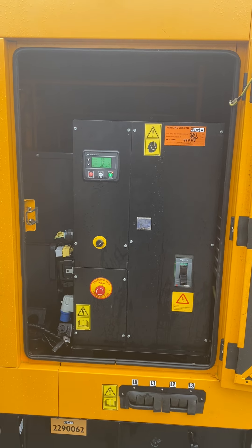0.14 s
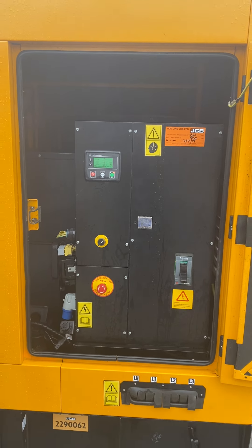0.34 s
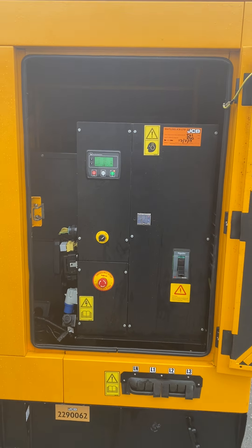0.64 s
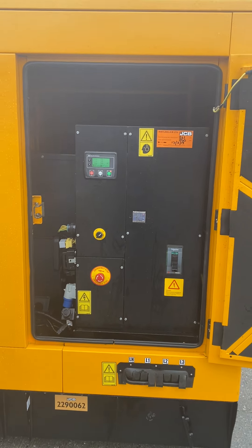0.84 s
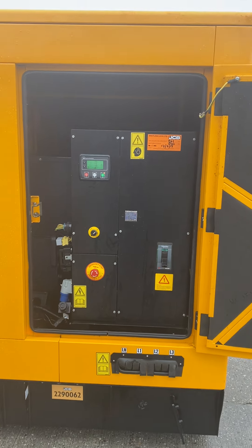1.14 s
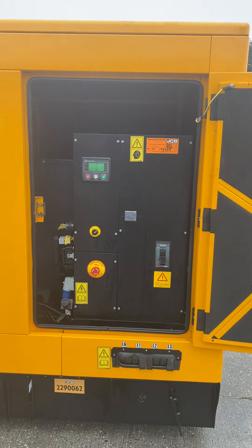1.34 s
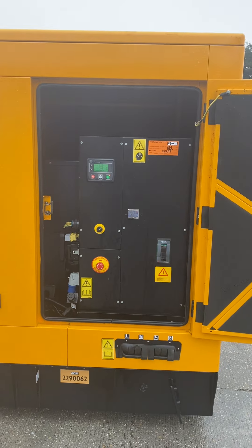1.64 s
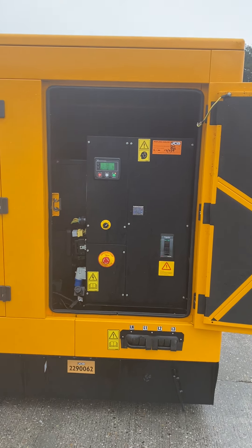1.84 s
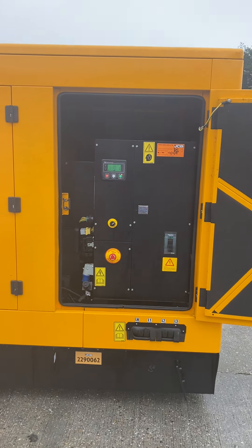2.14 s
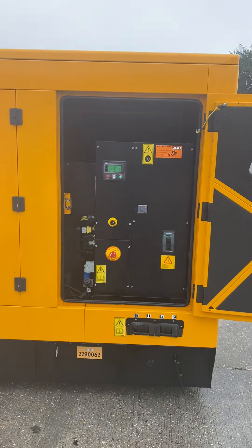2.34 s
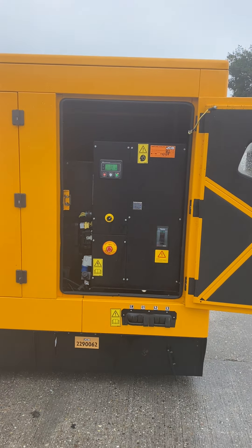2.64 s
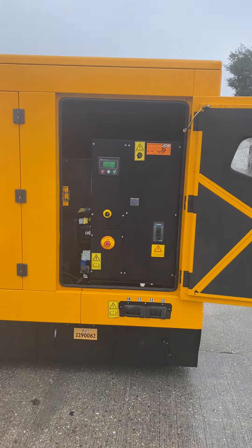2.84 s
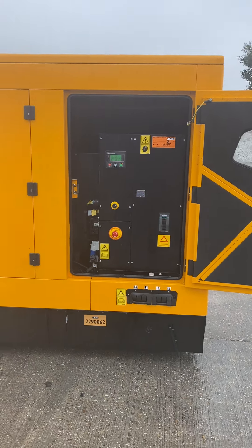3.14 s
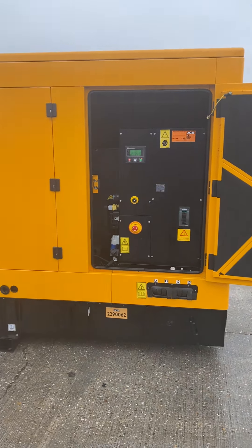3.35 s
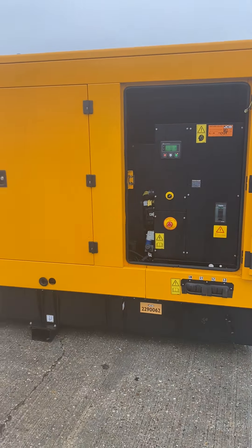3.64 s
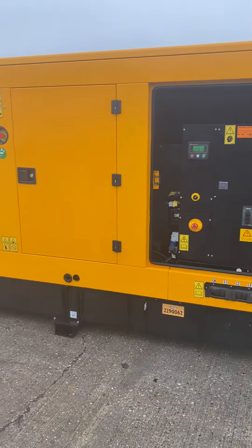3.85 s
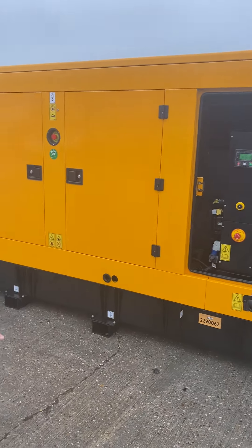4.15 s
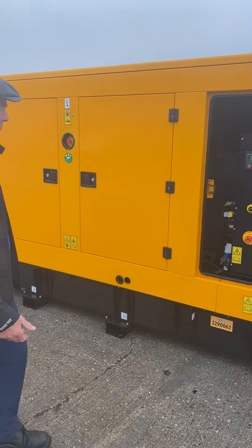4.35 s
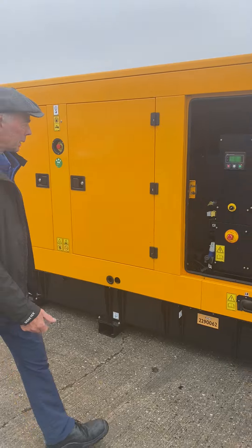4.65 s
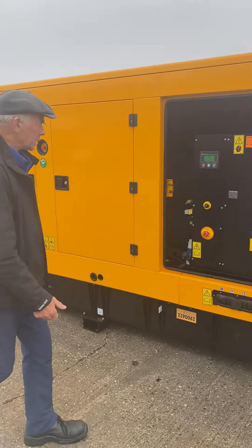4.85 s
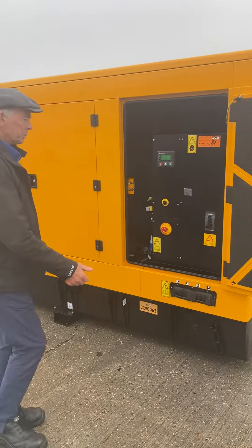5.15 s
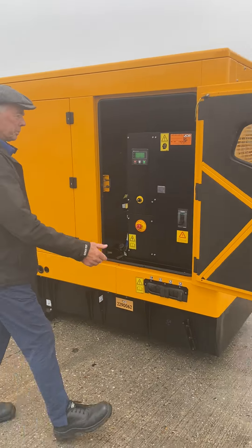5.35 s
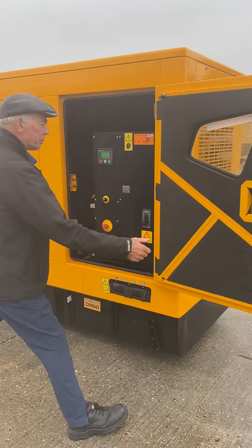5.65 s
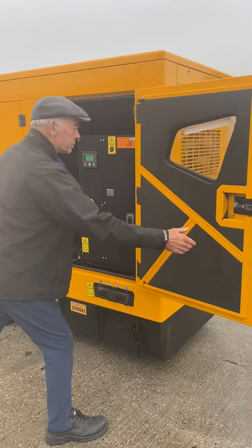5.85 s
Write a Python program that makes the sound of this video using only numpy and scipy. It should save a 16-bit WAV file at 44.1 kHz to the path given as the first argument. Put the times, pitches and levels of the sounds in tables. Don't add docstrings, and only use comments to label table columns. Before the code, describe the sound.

Close outdoor stereo pickup of a diesel engine inside a metal housing in a hard yard. Loud uneven clatter with surging pulses settles within a second into a regular rapid rattle over a deep hum. Midway the tone turns harder and more metallic near the side wall, air roar swells, the plastic case creaks, and a thin turbo whistle peeks through. A light cover tapping becomes clearer near the end.

```python
import sys
import numpy as np
from scipy import signal
from scipy.fft import rfft, irfft, next_fast_len
from scipy.io import wavfile
from scipy.ndimage import uniform_filter1d

SR = 44100
rng = np.random.default_rng(int(sys.argv[2]) if len(sys.argv) > 2 else 0)


def digitize_waveform(pressure):
    field = np.atleast_2d(pressure).T
    bounded = np.clip(field, -1, 1)
    quanta = np.round(bounded * 32767).astype(np.int16)
    wavfile.write(sys.argv[1], SR, quanta)


def gain_from_db(level_db):
    decades = np.asarray(level_db, float) / 20
    return 10 ** decades


N = 265041
T = np.arange(N) / SR
HZ = np.maximum(np.fft.rfftfreq(next_fast_len(N), 1 / SR), 1)

CYCLE = 3532
CYCLE_HZ = SR / CYCLE
FIRST_KNOCK_S = 0.0246

# start_s, nearness_db, side_share (0 at the door, 1 at the side wall), outlet_db (exhaust exposure)
WALK = [(0, 1, 0, 1.5), (.7, 0.5, 0, -2), (1.2, -1.5, 0, -2.5), (1.5, -2, 0.05, -3.5),
        (1.75, -4, 0.09, -6.5), (2.0, -4, 0, -8), (2.35, -4.5, 0.02, -3.5), (2.7, -3, 0.66, 1.5),
        (3.0, 0, 1, 3.5), (3.25, 1.5, 1, 6), (3.55, 0.5, 0.99, 1), (4.2, 0.5, 0.99, 0.5), (4.6, 0, 1, -1.5),
        (5.0, -1, 0.96, -4), (5.3, -3.5, 0.93, -1.5), (5.65, -4, .9, -3), (6.01, -7.5, 0.96, -2.5)]
CYLINDER_DB = [-1, -5, -7.5, -0.5, -13.5, -4]

# pitch_hz, width_hz, level_db
PANEL_DOOR = [(757, 44, 1.5), (800, 18.3, 2.5), (842.8, 81, 0), (700, 13, -29), (936, 37, -11)]
PANEL_SIDE = [(739, 37, -11.5), (786.3, 40, -3), (856.5, 38, -5), (907, 34, -8)]
# pitch_hz, width_hz, level_db
CAST_DOOR = [(1555, 78, -1), (1872, 25, 0.5), (2588, 29, 6), (2960, 12, 6), (3180, 34, -0.5),
             (3720, 59, 3.5), (3970, 54, 2), (4340, 37, 7)]
CAST_SIDE = [(1185, 12, -7.5), (1536, 26, -8.5), (2041, 54, -4.5), (2368, 27, 3), (2777, 12, 7.5),
             (2953, 43, 3), (3290, 57, -1), (3890, 63, -3), (4615, 64, 3.5), (6110, 63, -4)]
# pitch_hz, level_db
BLOCK_DOOR = [(580, -28.5), (980, -3), (1160, 1.5), (1200, -5.5), (1340, -2), (1410, -5), (1520, -2),
              (1760, -1.5), (1900, 0.5), (2310, -6.5), (2400, -17), (3120, -46), (5280, -120)]
BLOCK_SIDE = [(580, -30), (980, -1.5), (1030, -2.5), (1120, -4.5), (1160, -2.5), (1240, -4), (1370, -4.5),
              (1630, -1.5), (1780, -0.5), (2000, -4), (2400, -12.5), (3120, -42), (5280, -120)]
# pitch_hz, level_db
TICK_DOOR = [(1470, -9), (2500, -2), (2690, -1.5), (2800, -6.5), (3100, -7), (3420, -3.5), (3810, -5),
             (4170, -10), (4980, -14), (5430, -12.5), (7000, -13.5), (9100, -21), (15400, -120)]
TICK_SIDE = [(1470, -13), (2500, -0.5), (3050, -5.5), (3320, -3), (3590, -4.5), (4050, -4.5), (4920, -15.5),
             (5380, -9.5), (5480, -12), (6200, -10), (7000, -9.5), (9100, -20), (15400, -120)]
# pitch_hz, level_db (against the ring)
PANEL_ORDERS = [(749, -8.5), (849, -7.5)]
# pitch_hz, level_db (against the clatter)
ORDERS_SIDE = [(1000, -14.5), (1175, -12), (1275, -13), (1537, -30), (1574, -18.5), (1611, -14.5),
               (1686, -16.5), (2074, -19)]
# pitch_hz, level_db
RUMBLE_DOOR = [(53, -28), (90, -5.5), (97, -12), (150, -8), (220, -10), (285, -5.5), (350, -1), (460, -14),
               (600, -44.5), (1010, -120)]
RUMBLE_SIDE = [(53, -27), (90, -2.5), (107, -3), (274, -2.5), (312, -2.5), (338, -2), (377, -5),
               (460, -10.5), (600, -48), (1010, -120)]
# pitch_hz, level_db
HISS_DOOR = [(5500, -30), (7000, -6), (8200, 0), (10000, 1), (12000, 0), (14000, -1.5), (15700, -3)]
HISS_SIDE = [(5500, -30), (7000, -4), (8200, -2), (10000, -1), (12000, -1), (14000, -2), (15700, -3)]
# pitch_hz, level_db
DUCT_ROAR = [(440, -10.5), (480, 2), (580, 2.5), (680, 7.0), (720, 0)]

# door_db, side_db, nearness_share, outlet_share, startup_db, lope_db
PANEL_MIX = (-28, -37, 0.76, 0.08, 0, 4)
BLOCK_MIX = (-35, -34, 1.08, 0.02, 7, 3.5)
TICK_MIX = (-45.5, -42, 1.06, 0.03, 10, 2)
WHISTLE_MIX = (-84, -65, 0, 1.4, 0.1, -5)
TONE_MIX = (-44.5, -36, 1.1, 0.18, -4.3, -3)
RUMBLE_MIX = (-36.5, -37.5, 0.37, 1.21, 3, 0.5)
AIR_MIX = (-60, -59.5, 0.7, 0.3, 1, -0.5)
HISS_MIX = (-57.5, -62, 0.8, -0.24, 1, 1)
ROAR_MIX = (-50.5, -45, 1, 0.04, 6.5, 4)
TAP_MIX = (-48, -45.5, 0.3, 0.3, -6, -2)

# start_s, level_db (peak), pitch_hz
CREAKS = [
    (3.855, -15, 650),
    (3.864, -22, 640),
    (3.872, -32, 670),
    (4.011, -15.5, 710),
    (4.019, -15.5, 640),
    (4.026, -19, 700),
    (4.037, -14.5, 640),
    (4.129, -29, 694),
    (4.141, -20.5, 614),
    (4.149, -14.5, 633),
          (1.46, -30, 610),
    (1.527, -57, 640),
    (1.616, -28, 655),
    (1.703, -29.5, 646),
    (2.319, -49, 678),
    (2.398, -31, 665),
    (5.257, -38, 680),
    (5.729, -31, 630),
    (5.98, -34.5, 630),
]
# start_s, level_db (peak), pitch_hz
THUMPS = [
    (1.74, -38, 45),
    (4.04, -30, 42.4),
    (4.16, -33, 48),
]
# middle_s, level_db, width_s (of the bell-shaped swell), centre_hz
SCUFFS = [
    (0.75, -49, 0.012, 13000),
    (0.758, -35.5, 0.028, 9750),
    (3.21, -44, 0.0095, 9900),
    (3.344, -42.5, 0.019, 8050),
    (3.635, -51, .004, 13000),
    (3.933, -43, 0.0055, 9200),
]

# pitch_hz, level_db
LEAN = [(400, -23), (800, 8.5), (1300, -20.5), (2400, -7), (4400, -25.5)]
# pitch_hz, level_db
GROUND = [(400, -0.5), (830, -17), (1300, -16), (2400, -4), (4000, -9), (4700, -31)]
# pitch_hz, level_db
YARD = [(400, -13), (830, -14), (1100, -10), (2400, -8), (4200, -9), (6000, -12), (15700, -12)]
# low_hz, high_hz
NULL_HZ = (8530, 11120)

STARTUP_S = 0.53
LOPE_PEAK_S, LOPE_PERIOD_S, LOPE_ENDS_S, LOPE_FADE_S, LOPE_DECAY_S = 0.055, 0.1553, 0.58, 0.06, 1.4
STEADY_SHARE, SETTLE_S = 0.96, 0.1
TURN_S, TURN_LENGTH_S = 5.03, 0.42
TURN_TAP_DB, TURN_HISS_DB, TURN_ROAR_DB = 13, 3, 4.5
WHISTLE_HZ = 5198
BEAM_S, BEAM_WIDTH_S, BEAM_DB = 4.46, 0.2, 10
DUCT_S, DUCT_WIDTH_S, DUCT_DB = 3.44, 0.31, 7.5
TAP_HZ = 126 * CYCLE_HZ
CORNER_S, CORNER_WIDTH_S, CORNER_DB, CORNER_HZ = 2.89, 0.24, -35.5, 262
DOORWAY_HZ, DOORWAY_DB = 60 * CYCLE_HZ, -34
DOORWAY_FROM_S, DOORWAY_TO_S, DOORWAY_FADE_S = 0.56, 1.42, 0.098
RATTLE_HZ, RATTLE_DB, RATTLE_FROM_S, RATTLE_TO_S = 3320, -53, 4.2, 5.7
LEAN_DOOR, LEAN_SIDE, LEAN_TURNED = 0.76, 0.85, -0.3
LEAN_PER_DB = 0.14
PORT_LAG_S, GROUND_LAG_S = 53e-6, 0.000639
TOP_HZ = 15790


def engine(aside, steady):
    return panels(aside, steady) + block(aside, steady) + ticks(aside, steady) + whistle()


def panels(aside, steady):
    shaking = clatter(0.94, steady) * knocks(0.94, 0.0084)
    ringing = heard(shaking, modes(PANEL_DOOR, order=2), modes(PANEL_SIDE, order=2), aside)
    return gain_from_db(heard_db(PANEL_MIX)) * (ringing + lines(PANEL_ORDERS, 3.88))


def block(aside, steady):
    shaking = clatter(0.86, steady) * knocks(1.3, 0.0038, uneven=1.3)
    door = (1 + modes(CAST_DOOR, order=1)) * colour(BLOCK_DOOR)
    side = (1 + modes(CAST_SIDE, order=1)) * colour(BLOCK_SIDE)
    orders = lines(ORDERS_SIDE, 2.134)
    return gain_from_db(heard_db(BLOCK_MIX) - 1.42) * (heard(shaking, door, side, aside) + aside * orders)


def ticks(aside, steady):
    striking = clatter(0.37, steady) * knocks(1.74, 0.0027, uneven=3.7)
    door = (1 + modes(CAST_DOOR, order=1)) * colour(TICK_DOOR)
    side = (1 + modes(CAST_SIDE, order=1)) * colour(TICK_SIDE)
    return gain_from_db(heard_db(TICK_MIX) + 1.7) * heard(striking, door, side, aside)


def whistle():
    level_db = heard_db(WHISTLE_MIX) + BEAM_DB * passing(BEAM_S, BEAM_WIDTH_S)
    tone = np.sin(2 * np.pi * WHISTLE_HZ * T + 0.61 * walk(33))
    return gain_from_db(level_db + 2.1 * walk(8.2) + 3.0) * tone


def clatter(repeat, steady, memory=0.899):
    turns = rng.standard_normal((2, N // CYCLE + 41, CYCLE))
    turns = signal.lfilter([np.sqrt(1 - memory ** 2)], [1, -memory], turns, axis=1)
    again = turns[:, 40:].reshape(2, -1)[:, :N]
    share = repeat * steady
    return np.sqrt(share) * again + np.sqrt(1 - share) * rng.standard_normal((2, N))


def knocks(depth, decay_s, uneven=0.88):
    firing = (T - FIRST_KNOCK_S) * CYCLE_HZ * 6
    since_s = firing % 1 / (6 * CYCLE_HZ)
    cylinder = np.floor(firing).astype(int) % 6
    size = gain_from_db(uneven * np.array(CYLINDER_DB))[cylinder]
    return 1 + depth * size * np.exp(-since_s / decay_s) * (1 - np.exp(-since_s / 0.0007))


def lines(table, rate):
    out = np.zeros(N)
    for hz, db in table:
        phase = 2 * np.pi * rng.random() + 1.3 * walk(6)
        out += gain_from_db(db + 4.75 * walk(rate)) * np.sin(2 * np.pi * hz * T + phase)
    return out


def exhaust(aside, steady):
    tone = np.sqrt(2) * np.sin(2 * np.pi * 6 * CYCLE_HZ * T + 0.35 * walk(5)) * gain_from_db(0.6 * walk(9))
    blur = unit(shape(clatter(0.72, steady)[0], ring(77.3, 44) ** 2))
    throb = gain_from_db(heard_db(TONE_MIX)) * (1.03 * tone + 0.51 * blur)
    rumble = heard(clatter(0.37, steady)[0], colour(RUMBLE_DOOR), colour(RUMBLE_SIDE), aside)
    air = unit(shape(rng.standard_normal(N), ring(52, 21) ** 2))
    return throb + gain_from_db(heard_db(RUMBLE_MIX)) * rumble + gain_from_db(heard_db(AIR_MIX) + 7) * air


def corner(steady):
    boom = unit(shape(clatter(0.46, steady)[0], ring(CORNER_HZ, 130) ** 2))
    return gain_from_db(CORNER_DB) * passing(CORNER_S, CORNER_WIDTH_S) * boom


def doorway():
    facing = ramp(DOORWAY_FROM_S, DOORWAY_FADE_S) - ramp(DOORWAY_TO_S, DOORWAY_FADE_S)
    tone = np.sin(2 * np.pi * DOORWAY_HZ * T + 0.93 * walk(14.2))
    return gain_from_db(DOORWAY_DB + 1.8 * walk(25.1)) * facing * tone


def cover():
    since_s = (T - FIRST_KNOCK_S - 0.016) % (1 / (3 * CYCLE_HZ))
    ringing = np.exp(-since_s / 0.0056) * (1 - np.exp(-since_s / 0.0024))
    level_db = heard_db(TAP_MIX) + TURN_TAP_DB * ramp(TURN_S, TURN_LENGTH_S)
    tone = np.sin(2 * np.pi * TAP_HZ * T + 0.36 * walk(9.3))
    return gain_from_db(level_db + 8.0 + 0.97 * walk(26)) * ringing * tone


def latch(steady):
    buzz = unit(shape(clatter(0.66, steady)[0] * knocks(3.7, 0.004), ring(RATTLE_HZ, 220) ** 2))
    nearby = ramp(RATTLE_FROM_S, 0.15) - ramp(RATTLE_TO_S, 0.08)
    return gain_from_db(RATTLE_DB + 3.1 * walk(7.7)) * nearby * buzz


def fan(aside, steady):
    stirred = rng.standard_normal((2, N)) * knocks(1.1, 0.0026, uneven=1.1)
    hiss = heard(stirred, colour(HISS_DOOR), colour(HISS_SIDE), aside)
    hiss = hiss * gain_from_db(0.6 * walk(18) + 0.7 * walk(40))
    hiss_db = heard_db(HISS_MIX) + TURN_HISS_DB * ramp(TURN_S, TURN_LENGTH_S)
    roar = unit(shape(clatter(0.54, steady), colour(DUCT_ROAR)))
    roar_db = heard_db(ROAR_MIX) + DUCT_DB * passing(DUCT_S, DUCT_WIDTH_S)
    roar_db = roar_db - TURN_ROAR_DB * passing(TURN_S, TURN_LENGTH_S)
    return gain_from_db(hiss_db + 8.5) * hiss + gain_from_db(roar_db - 3.0 + 1.5 * walk(10)) * roar


def handling(events, cycles):
    out = np.zeros(N)
    for s, db, hz in events:
        t = np.maximum(T - s, 0) * hz / cycles
        out += gain_from_db(db) * (np.e * t / 2) ** 2 * np.exp(-t) * np.sin(2 * np.pi * cycles * t)
    return out


def scuffs():
    out = np.zeros(N)
    for s, db, length_s, hz in SCUFFS:
        crowding = 7.7 * uniform_filter1d(rng.standard_normal(N), size=60)
        grains = rng.standard_normal(N) * gain_from_db(3.9 * crowding)
        out += gain_from_db(db) * unit(shape(grains, ring(hz, 4000) ** 2)) * passing(s, length_s)
    return out


def heard(x, door, side, aside):
    return np.sqrt(1 - aside) * unit(shape(x, door)) + np.sqrt(aside) * unit(shape(x, side))


def heard_db(mix):
    door_db, side_db, near_share, outlet_share, startup_db, lope_db = mix
    near_db, aside, outlet_db = curves(WALK)
    heave = np.cos(2 * np.pi * (T - LOPE_PEAK_S) / LOPE_PERIOD_S)
    lope = heave * (1 - ramp(LOPE_ENDS_S, LOPE_FADE_S)) * np.exp(-T / LOPE_DECAY_S)
    place_db = door_db + (side_db - door_db) * np.clip(aside, 0, 1)
    place_db = place_db + near_share * near_db + outlet_share * outlet_db
    return place_db + startup_db * np.exp(-T / STARTUP_S) + lope_db * lope


def curves(table):
    s, *columns = np.transpose(table)
    return [np.interp(T, s, c) for c in columns]


def passing(at_s, width_s):
    return np.exp(-((T - at_s) / width_s) ** 2 / 2)


def ramp(at_s, length_s):
    return (1 + np.tanh((T - at_s) / length_s)) / 2


def walk(rate):
    k = int(SR / rate)
    held = np.repeat(rng.standard_normal(N // k + 1), k)
    return 1.61 * uniform_filter1d(uniform_filter1d(held, k), k)[:N]


def unit(x):
    return x / np.sqrt(np.mean(x ** 2))


def shape(x, gain):
    size = next_fast_len(N)
    return irfft(rfft(x, size, axis=-1) * gain, size, axis=-1)[..., :N]


def colour(points):
    hz, db = np.transpose(points)
    return gain_from_db(np.interp(np.log(HZ), np.log(hz), db, -120, -120))


def ring(hz, width):
    return 1 / (1 + 1j * (HZ / hz - hz / HZ) * hz / width)


def modes(table, order):
    return sum(gain_from_db(db) * ring(hz, width) ** order for hz, width, db in table)


def edge(hz, order):
    return 1 / (1 + (hz / HZ) ** order)


def delay(lag_s):
    return np.exp(-2j * np.pi * HZ * lag_s)


def scene():
    near_db, aside, _ = curves(WALK)
    aside = np.clip(aside, 0, 1)
    turned = ramp(TURN_S, TURN_LENGTH_S)
    steady = STEADY_SHARE * ramp(LOPE_ENDS_S, SETTLE_S / 2)
    direct, yard = engine(aside, steady) + fan(aside, steady)
    direct = direct + exhaust(aside, steady) + corner(steady) + doorway() + cover() + latch(steady)
    direct = direct + handling(CREAKS, 0.69) + handling(THUMPS, 0.4) + scuffs()

    high = edge(3100, order=12)
    late = shape(direct, 1 - high + high * delay(PORT_LAG_S))
    null = edge(NULL_HZ[0], order=40) * (1 - edge(NULL_HZ[1], order=36))
    mid = shape((direct + late) / 2 + shape(yard, 0.24 * high), 1 - null)

    lean = LEAN_DOOR + (LEAN_SIDE - LEAN_DOOR) * aside + LEAN_TURNED * turned + LEAN_PER_DB * near_db
    ground = shape(direct, colour(GROUND) * delay(GROUND_LAG_S))
    side = (direct - late) / 2 + lean * shape(direct, colour(LEAN)) + ground
    side = side + shape(np.roll(yard, 900), colour(YARD))
    narrow, broad = shape(side, edge(852, order=16)), shape(side, edge(480, order=16))
    side = narrow + 1.55 * turned * (broad - narrow)
    return np.array([mid + side, mid - side])


def roll_off(x):
    return signal.sosfilt(signal.butter(12, 16820, fs=SR, output="sos"), x)


def record(dry):
    mix = shape(dry, 1 - edge(TOP_HZ, order=400))
    return roll_off(mix)


dry = scene()
out = record(dry)
digitize_waveform(out)
```